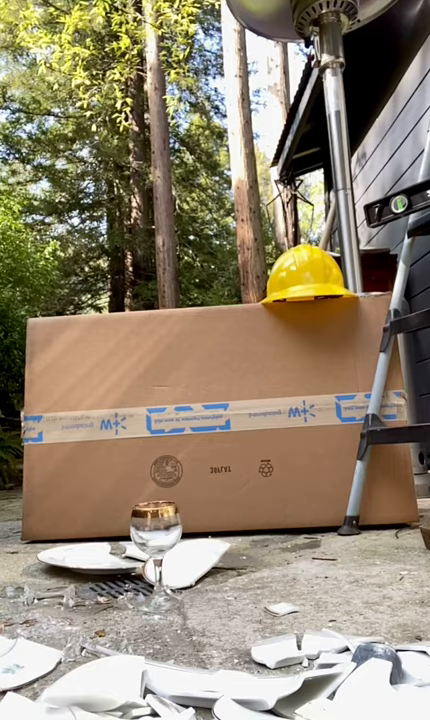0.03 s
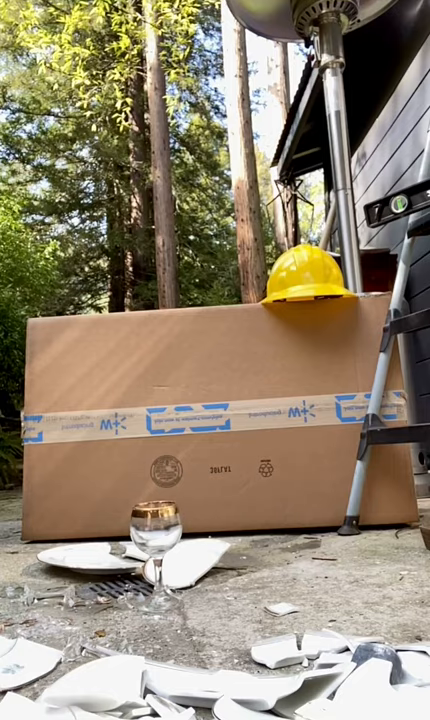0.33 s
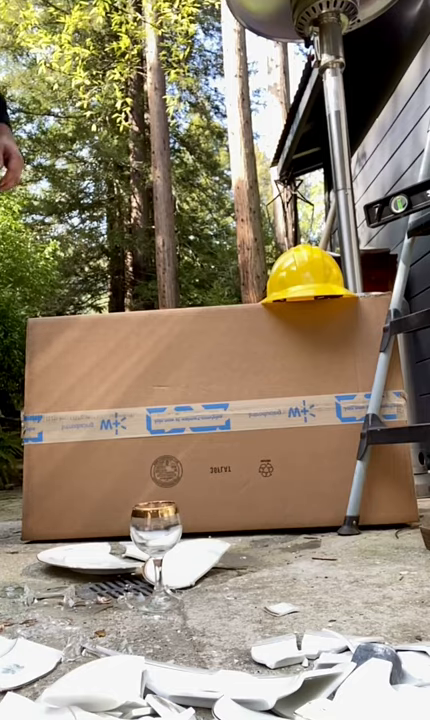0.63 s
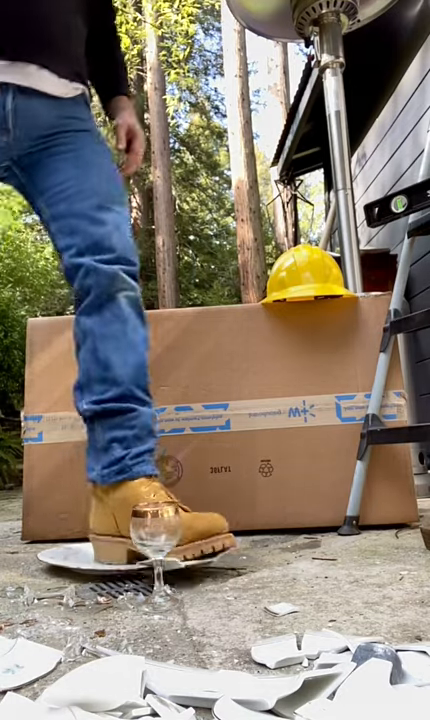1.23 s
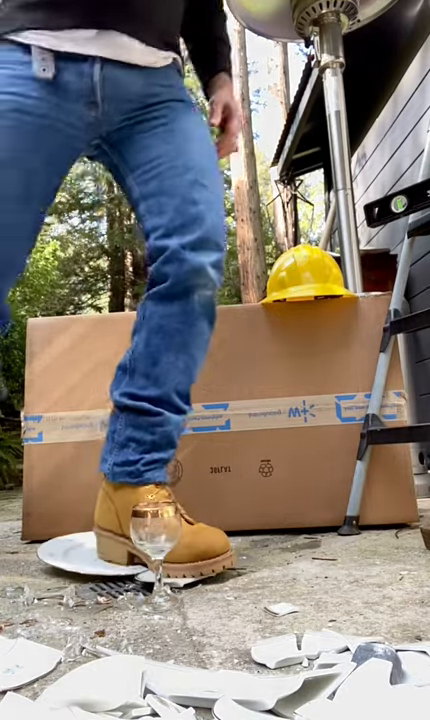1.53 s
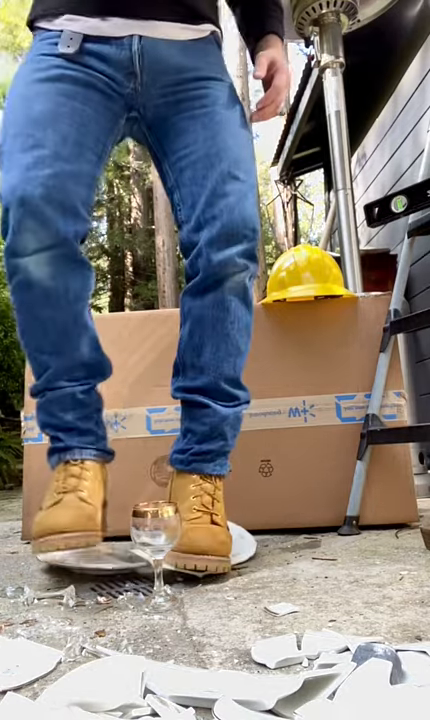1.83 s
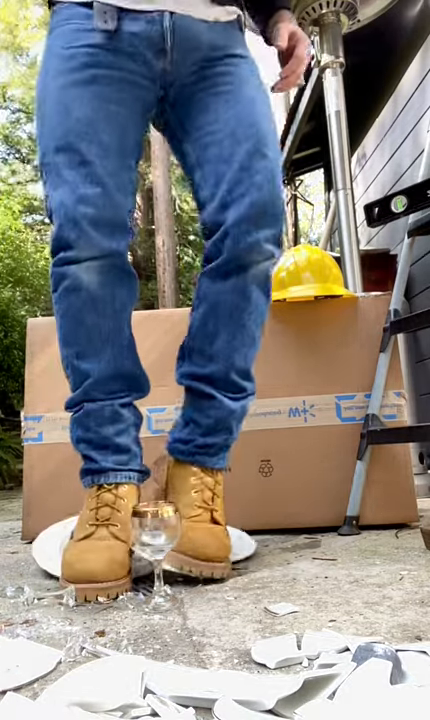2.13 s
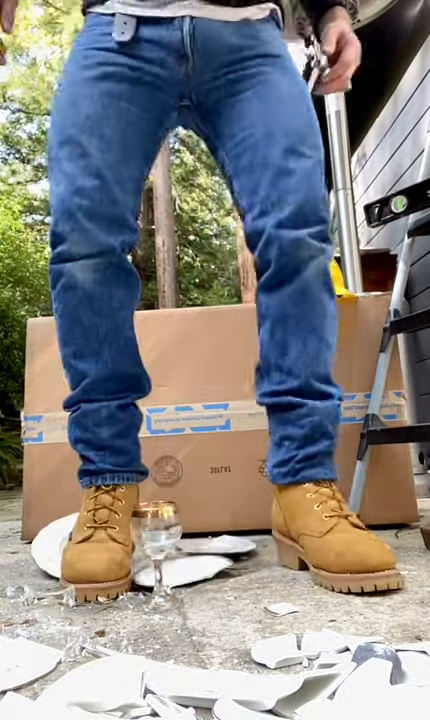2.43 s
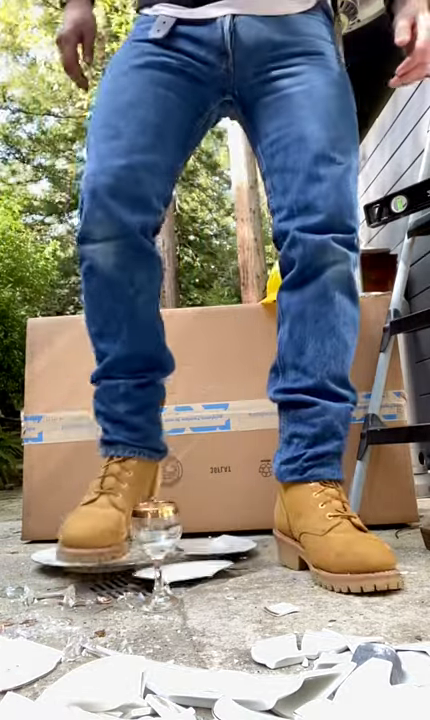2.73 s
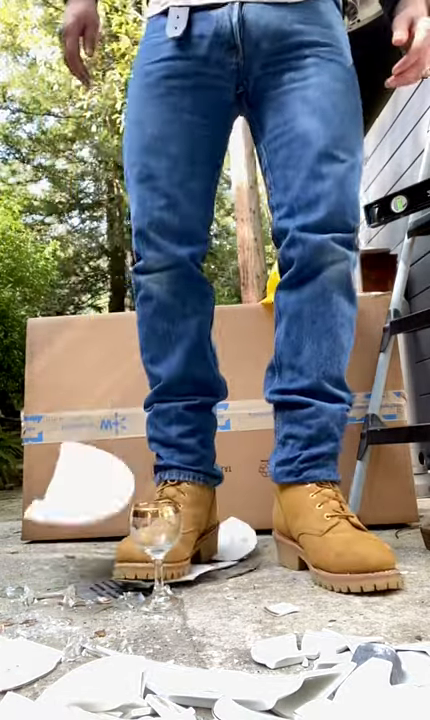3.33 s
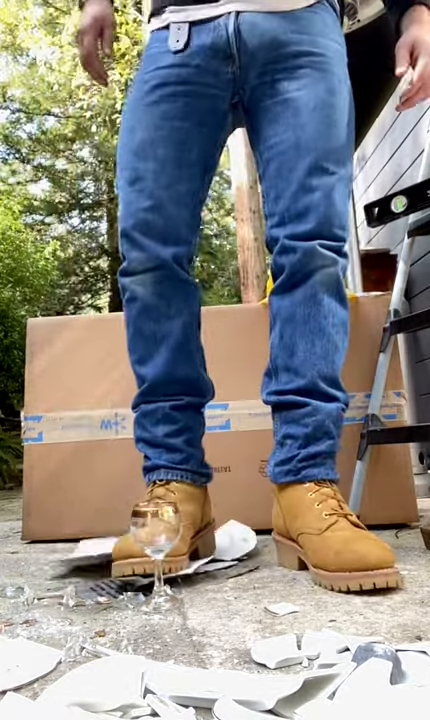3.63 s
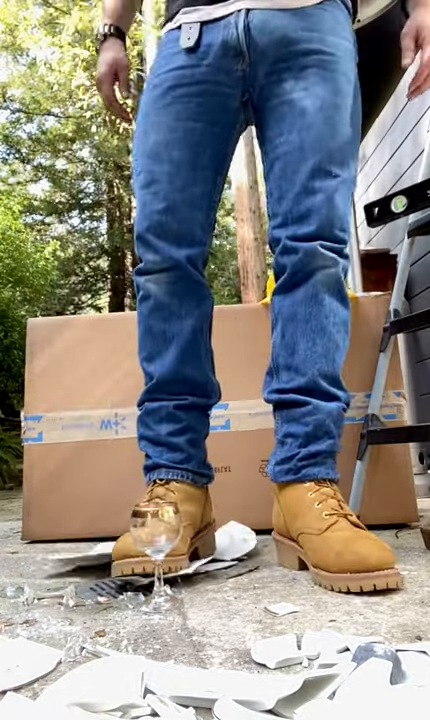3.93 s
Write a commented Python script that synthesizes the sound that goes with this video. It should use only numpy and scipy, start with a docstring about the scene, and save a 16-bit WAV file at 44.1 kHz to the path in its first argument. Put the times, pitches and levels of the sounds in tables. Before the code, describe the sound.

Close up in a quiet yard, ceramic plates snap sharply as boots step onto them. Shards crunch and rock on the concrete, two stomps bring loud cracks with dull thuds, and a loose piece rings as it settles.

```python
"""Boots breaking china plates

Heavy boots step onto plates on a concrete yard, close to the microphone. The first plate cracks;
its pieces grind and rock under the soles. Two stomps break the stack, and a large piece lands and
wobbles, ringing. China rings in damped modes, each contact adds a knock, splinters and grit,
and the soles thud as low noise bursts. Nearby walls answer briefly."""
import sys
import numpy as np
from scipy import signal
from scipy.fft import rfft, irfft, next_fast_len
from scipy.io import wavfile
from scipy.ndimage import uniform_filter1d, minimum_filter1d

SR = 44100
rng = np.random.default_rng(int(sys.argv[2]) if len(sys.argv) > 2 else 0)


def pcm_store(signal):
    """Save signal as 16-bit PCM."""
    levels = np.round(np.clip(np.atleast_2d(signal), -1, 1) * 32767)
    wavfile.write(sys.argv[1], SR, levels.astype(np.int16).T)


N = 4 * SR
WIDTH, PHASE_SPREAD_RAD = 0.35, 0.66  # stereo spread of noise, of modes


def amp(db):
    """dB to gain."""
    return 10 ** (np.asarray(db) / 20)


def unit(x):
    """Scale to rms 1."""
    return x / np.sqrt(np.mean(x ** 2) + 1e-20)


def along(points, hz):
    """Interpolate (f/Hz, value) points over log frequency."""
    f, v = np.transpose(points)
    return np.interp(np.log(hz + 1e-9), np.log(f), v)


def fade(t, t60):
    """Decay by 60 dB in t60."""
    return np.exp(-np.log(1000) * t / np.maximum(t60, .002))


def rise(t, attack_s):
    """Exponential onset."""
    return 1 - np.exp(-t / max(attack_s, 1e-4))


def filtered(x, response):
    """Apply a frequency response by FFT."""
    n = x.shape[-1]
    m = next_fast_len(n + 4096)
    return irfft(rfft(x, m) * response(np.fft.rfftfreq(m, 1 / SR)), m)[..., :n]


def noise(size, shape_db, width):
    """Shaped stereo noise, rms 1; width is side over mid."""
    mid, side = filtered(rng.standard_normal((2, size)), lambda hz: amp(shape_db(hz)))
    return unit(np.array([mid + width * side, mid - width * side]))


def add(out, start_s, sound):
    """Mix a sound in at start_s."""
    i = max(round(start_s * SR), 0)
    out[:, i:i + sound.shape[1]] += sound[:, :max(N - i, 0)]


def ring(hz, envelopes, t, slip_rad=0):
    """Sum of modes, each reaching the two channels in its own phase."""
    start = rng.uniform(0, 2 * np.pi, len(hz))
    turn = PHASE_SPREAD_RAD * rng.standard_normal(len(hz))
    phase = (2 * np.pi * np.outer(hz, t) + start[:, None] + slip_rad).astype(np.float32)
    mid = np.cos(turn) @ (envelopes * np.sin(phase))
    side = np.sin(turn) @ (envelopes * np.cos(phase))
    return np.array([mid + side, mid - side])


# air spectrum: f/Hz, level/dB
AIR_SPECTRUM = [(25, -4), (140, -1), (400, -16.5), (1100, -27.5), (6000, -42), (14000, -84)]


def air():
    """Quiet outdoor rumble."""
    return amp(-68) * noise(N, lambda hz: along(AIR_SPECTRUM, hz), width=0.083)


# approaching steps: t/s, level/dB, sigma/s, centre f/Hz
SCUFFS = [(.3, -72, 0.034, 810), (0.414, -66, 0.024, 1630)]


def scuffs():
    """Soles rub the ground: soft swells of band noise."""
    out, t = np.zeros((2, N)), np.arange(N) / SR
    for at_s, db, sigma_s, centre_hz in SCUFFS:
        rub = noise(N, lambda hz: -13 * np.log2((hz + 1) / centre_hz) ** 2, WIDTH)
        out += amp(db) * np.exp(-.5 * ((t - at_s) / sigma_s) ** 2) * rub
    return out


# grinding under the weight: t/s, level/dB
GRIND_LEVELS = [(1.04, -100), (1.12, -33.5), (1.25, -63), (1.369, -44), (1.469, -52.5), (1.6, -30.5),
                (1.86, -46.5), (2.12, -43), (2.749, -46), (2.949, -69.5), (3.101, -38), (3.271, -50.5),
                (3.68, -45), (4, -44)]
# crumb spectrum: f/Hz, level/dB
CRUMB_SPECTRUM = [(40, -12), (120, -13.5), (800, -4), (1600, -4.5), (2600, -7), (5500, -14.5), (12000, -31)]


def grinding(ticks_per_s=230, clumps_per_s=60, modes=30):
    """Crumbs crush in clumps of ticks; as the weight shifts, other loose shards take up the ringing."""
    clock, t = np.arange(N) / SR, np.arange(SR // 3) / SR
    clumps = np.interp(clock * clumps_per_s, np.arange(N), rng.exponential(size=N)) ** 2
    crushed = rng.random(N) < ticks_per_s / SR * clumps / clumps.mean()
    ticks = crushed * amp(4 * np.minimum(rng.exponential(size=N), 2))
    weight = amp(np.interp(clock, *np.transpose(GRIND_LEVELS)))
    pressed = unit(ticks * rng.choice([-1, 1], N)) * weight
    out, block = np.zeros((2, N)), SR // 10
    for i in range(0, N, block):
        hz = 800 * 8 ** ((np.arange(modes) + rng.random(modes)) / modes)
        gains = np.sqrt(hz) * amp(5 * rng.uniform(-2, 1, modes))
        shards = ring(hz, gains[:, None] * fade(t, t60=.12), t)
        crunch = noise(len(t), np.zeros_like, WIDTH) * fade(t, t60=0.012)
        response = np.pad(unit(shards) + amp(-4) * unit(crunch), ((0, 0), (128, 0)))
        response = filtered(response, lambda f: amp(along(CRUMB_SPECTRUM, f)))
        response /= np.linalg.norm(response[0])
        add(out, i / SR, signal.fftconvolve(pressed[None, i:i + block], response, axes=1))
    return out


# sole impacts: t/s, relative level/dB, centre f/Hz, t60/s
THUDS = [(0.243, -56.5, 136, 0.39), (1.116, -33, 330, 0.14), (1.136, -32, 253, 0.2),
         (1.343, -36.5, 256, 0.17), (2.359, -43.5, 298, 0.084), (2.378, -46.5, 80, 0.18),
         (2.999, -22.5, 378, 0.029), (3.01, -30.5, 195.6, 0.088), (3.353, -19, 367, 0.039)]
# thud spectrum: f/centre, level/dB
THUD_SPECTRUM = [(.1, -34), (1, -1), (1.6, -3.5), (3, -29), (16, -93)]


def soles():
    """Rubber soles hit the ground: dull noise bursts."""
    out, t = np.zeros((2, N)), np.arange(SR // 2) / SR
    for at_s, db, centre_hz, t60 in THUDS:
        thud = noise(len(t), lambda hz: along(THUD_SPECTRUM, hz / centre_hz), width=0.049)
        envelope = fade(t, t60) * rise(t, attack_s=0.00061)
        add(out, at_s, amp(db + 5) * unit(thud * envelope) * np.sqrt(np.mean(envelope ** 2)))
    return out


def rattle(t, modes, rate_hz=61):
    """Rattling contact: a decaying random flutter per mode."""
    knots = rng.standard_normal((modes, 400))
    flutter = np.array([np.interp(t * rate_hz, np.arange(len(row)), row) for row in knots])
    return fade(t, t60=0.4) * flutter


def china(modes, blows, chokes_s=(), choke_db=6.5, choke_ramp_s=0.0071, focus_oct=0.089):
    """Struck china: the contact point favours some modes, rattle roughens them, the sole chokes them."""
    out, t = np.zeros((2, N)), np.arange(SR * 4 // 5) / SR
    hz, mode_db, t60 = np.transpose(modes)
    for at_s, db, tilt, focus_hz, boost_db, t60_factor in blows:
        focus_db = boost_db * np.exp(-.5 * (np.log2(hz / focus_hz) / focus_oct) ** 2)
        scatter_db = 1.5 * rng.standard_normal(len(hz))
        gains = amp(db + mode_db + tilt * np.log2(hz / 2000) + focus_db + scatter_db)
        envelopes = gains[:, None] * fade(t, t60_factor * t60[:, None]) * (1 + 0.55 * rattle(t, len(hz)))
        ringing = ring(hz, envelopes, t, slip_rad=.5 * rattle(t, len(hz)))
        pinned = sum(np.clip((at_s + t - s) / choke_ramp_s, 0, 1) for s in chokes_s if s > at_s)
        edges = rise(t, 0.004) * rise(t[-1] - t, .05)
        add(out, at_s, ringing * amp(-choke_db * pinned) * edges)
    return out


# first plate's modes: f/Hz, level/dB, t60/s
FIRST_MODES = [(1760, -4, .11), (2280, -7, .22), (2747, -4, .24), (3045, 5, .09), (3390, -2, .13),
               (3790, -1, .09), (4934, -3, .08)]
# its crack: t/s, level/dB, tilt/(dB/oct), focus f/Hz, boost/dB, t60 factor
FIRST_CRACK = [(1.16, -14, 0.025, 3045, 1, 0.72)]


def first_plate():
    """The first plate rings briefly as it cracks."""
    return china(FIRST_MODES, FIRST_CRACK)


# flat piece's modes: f/Hz, level/dB, t60/s
PIECE_MODES = [(940, -1.5, 0.19), (1232, 7.5, 0.5), (1455, 6.5, 0.33), (1666, 5, 0.15), (2326, 2.5, 0.21),
               (2960, -4, 0.79), (3920, -14, 0.72), (4990, -19.5, 0.39)]
# its contacts: t/s, level/dB, tilt/(dB/oct), focus f/Hz, boost/dB, t60 factor
PIECE_BLOWS = [(2.072, -34, 7.5, 5020, 18, 0.3), (2.159, -33.5, -4, 1696, 13, 1.96),
               (2.225, -47.5, 7, 1466, 22.3, 2.5), (2.311, -30, -1, 2263, 4.9, 0.24),
               (2.376, -42.5, 7.5, 1466, 22, 0.74), (2.44, -39.5, 3.5, 1466, 12, 0.95)]


def rocking_piece():
    """A flat piece rocks under the boot, which pins it three times."""
    return china(PIECE_MODES, PIECE_BLOWS, chokes_s=(2.262, 2.393, 2.484))


# large plate's modes: f/Hz, level/dB, t60/s
PLATE_MODES = [(712.6, -13.5, 1.87), (795, -4.5, 0.93), (1416, -2, 0.81), (1472, -0.5, 1.13),
               (2037, -4.5, 0.92), (2394, 5, 0.48), (2532, -1.5, 1.2), (2758, 12.5, 0.13), (3137, -2, 0.6),
               (3770, 1, 0.18), (4000, 2, 0.28), (4770, -4, 0.23), (5550, -25.5, 0.57)]
# blows on it: t/s, level/dB, tilt/(dB/oct), focus f/Hz, boost/dB, t60 factor
PLATE_BLOWS = [(1.708, -28, -8, 1337, 17, 0.32), (1.728, -39, -1, 2626, 15, 0.39),
               (1.764, -34.5, 1, 832, 10, 0.57), (2.283, -37, -14.5, 689, -3, 0.13),
               (2.546, -48.5, -7, 2867, 19, 0.61), (2.647, -36, -4, 823, 24.5, 0.31),
               (2.652, -37.5, -6, 1397, 24.5, 0.46), (2.69, -37.5, -4.5, 2170, 20.5, 0.45),
               (3.004, -29, -6, 5700, 14, 1.38), (3.351, -18, 0.5, 2080, 14.5, 0.37),
               (3.356, -43.5, -15.5, 1531, 29.5, 0.32), (3.447, -26.5, 0, 728, 18, 0.72),
               (3.657, -38, -6, 1413, 19.5, 0.91), (3.706, -39, 10, 2500, 9.5, 0.72),
               (3.738, -40.5, 10.5, 1438, 24.5, 0.47), (3.944, -47, -3, 1529, 23, 0.69)]


def large_plate():
    """The large plate rings under the boots, then on landing and wobbling."""
    return china(PLATE_MODES, PLATE_BLOWS, chokes_s=(3.5,))


def knock(t, hz, peak_s=0.0012, tail_gain=0.34):
    """Pinned china: a pitched pulse swells, is choked and rings on faintly."""
    swell = t / peak_s * np.exp(1 - t / peak_s)
    tail = tail_gain * fade(t, t60=0.06) * rise(t, peak_s)
    return np.sin(2 * np.pi * hz * t) * (swell + tail) / (1 + tail_gain)


# splinter and grit spectrum: f/Hz, level/dB
CLATTER_SPECTRUM = [(100, -22.5), (300, -8.5), (600, -1), (1400, 4), (2500, 1), (4000, -2.5), (5800, -8.5),
                    (12000, -18.5)]


def clatter(t, tilt, t60, count=64, attack_s=0.00083):
    """Splinters ring one after another over a burst of toneless grit."""
    def colour_db(hz):
        return along(CLATTER_SPECTRUM, hz) + tilt * np.log2(np.clip(hz, 500, 6000) / 2000)

    hz = 700 + 11000 * ((np.arange(count) + rng.random(count)) / count) ** 2
    gains = amp(colour_db(hz) + 9 * rng.uniform(-1.7, 1, count))
    gains /= np.linalg.norm(gains)
    delay_s = .4 * t60 * rng.random((count, 1)) ** 4
    age_s = np.maximum(t - delay_s, 0)
    decays = gains[:, None] * fade(delay_s, 2 * t60) * fade(age_s, 0.64 * t60)
    splinters = ring(hz, np.sqrt(2) * decays * np.minimum(age_s / attack_s, 1), t)
    grit = noise(len(t), colour_db, WIDTH) * fade(t, t60) * rise(t, attack_s)
    return amp(1.5) * splinters + amp(-6.5) * grit


# hits and snaps: t/s, knock f/Hz, knock level/dB, clatter level/dB, clatter tilt/(dB/oct), clatter t60/s
CLACKS = [(1.068, 595, -31, -37, -4, 0.2), (1.101, 562, -25, -31, -2, 0.13),
          (1.118, 518, -26, -24.5, 9.5, 0.28), (1.142, 2210, -30.5, -31, 9, .15),
          (1.157, 3990, -9.5, -10.5, 7, 0.048), (1.164, 1586, -12.5, -17, 3, 0.05),
          (1.171, 3066, -12, -20, 5.5, .07), (1.276, 1698, -27.5, -31, 4, 0.066),
          (1.301, 1720, -22, -27, 5, 0.18), (1.319, 1706, -16.5, -19.5, 7, 0.07),
          (1.344, 1437, -10, -21, 8, 0.14), (1.407, 1665, -26.5, -35.5, 12, 0.082),
          (1.593, 1590, -25.5, -30.5, 0, 0.14), (1.607, 1740, -18.5, -34.5, -1, 0.58),
          (1.642, 1815, -9, -20, 1, 0.085), (1.708, 1230, -14.5, -23.5, -3.5, 0.044),
          (1.764, 572, -24, -26.5, -4.5, 0.32), (1.892, 1020, -26, -23, -1.5, 0.13),
          (1.91, 1020, -23.5, -26.5, 3.5, 0.074), (1.942, 952, -22, -31, 0, 0.082),
          (1.956, 981, -24.5, -42, -10.5, 0.067), (2.006, 990, -24.5, -32.5, -12.5, 0.062),
          (2.071, 1344, -14.5, -27.5, 2.5, 0.2), (2.282, 882, -23, -28, 5, 0.13),
          (2.36, 870, -27.5, -42, -15, 0.41), (2.538, 1034, -23, -37.5, 1.5, 0.49),
          (2.647, 1450, -9, -32, -1.5, 0.097), (2.688, 1204, -12.5, -35.5, -3.5, 0.38),
          (2.985, 1178, -19, -23, -2, 0.1), (2.995, 956, -12, -12, -3, 0.07),
          (3.003, 1435, -4, -14, 21.5, 0.18), (3.166, 4870, -30, -43, -10, 0.081),
          (3.351, 1128, -3.5, -13, 3, 0.09), (3.444, 830, -27.5, -17, 11.5, .14),
          (3.579, 1750, -24, -29, 0, 0.37), (3.618, 1032, -13.5, -23.5, -1, 0.15),
          (3.66, 1086, -25, -31, 4.5, 0.33), (3.707, 4680, -20.5, -28, 5.5, 0.12),
          (3.741, 2830, -26.5, -37.5, 1.5, 0.052), (3.82, 1070, -29.5, -36.5, -6, 0.15),
          (3.932, 1140, -24.5, -31.5, -7, 0.18)]


def clacks():
    """China snaps or hits concrete: a knock plus clatter each time."""
    out, t = np.zeros((2, N)), np.arange(SR // 4) / SR
    for at_s, knock_hz, knock_db, clatter_db, tilt, t60 in CLACKS:
        add(out, at_s, amp(knock_db) * knock(t, knock_hz) + amp(clatter_db) * clatter(t, tilt, t60))
    return out


def left_lead(hz, lag_s=.00009, max_rad=3.76):
    """Stereo response: left arrives ahead of right, with a soft limit on the phase lead."""
    lead_rad = max_rad * np.tanh(2 * np.pi * hz * lag_s / max_rad)
    return np.exp(.5j * lead_rad * np.array([[1], [-1]]))


# wall reverberation: f/Hz, t60/s
WALL_DECAY = [(1500, 0.27), (12000, 0.24)]


def walls(x):
    """Reflections off the yard walls: a short noise tail."""
    hz, t, spectrum = signal.stft(rng.standard_normal((2, SR // 2)), SR, nperseg=256)
    _, tail = signal.istft(spectrum * fade(t, along(WALL_DECAY, hz)[:, None]), SR, nperseg=256)
    tail *= rise(np.arange(tail.shape[1]) / SR, attack_s=0.0023)
    return signal.fftconvolve(x, tail / np.linalg.norm(tail[0]), axes=1)[:, :N]


def scene():
    """Close boots and china, their reflections, and the background."""
    plates = large_plate() + rocking_piece() + first_plate()
    near = filtered(clacks() + plates + soles() + grinding(), left_lead)
    return near + amp(-14) * walls(near) + air() + scuffs()


# microphone response: f/Hz, level/dB
MIC_RESPONSE = [(20, -7.5), (100, 1.5), (4000, 3), (5700, 2.5), (6500, -7), (7700, -20.5), (9000, -22.5),
                (12000, -20), (14000, -51.5)]
CEILING, BAND_LIMIT_HZ = .9, 13900


def record(dry):
    """The microphone dulls the treble, a fast limiter holds the peaks, a low-pass ends the band."""
    x = filtered(dry, lambda hz: amp(along(MIC_RESPONSE, hz)))
    needed_gain = np.minimum(1, CEILING / (np.abs(x).max(axis=0) + 1e-9))
    gain = uniform_filter1d(minimum_filter1d(needed_gain, size=200), size=150)
    return filtered(x * gain, lambda hz: hz < BAND_LIMIT_HZ)


dry = scene()
out = record(dry)
pcm_store(out)
```